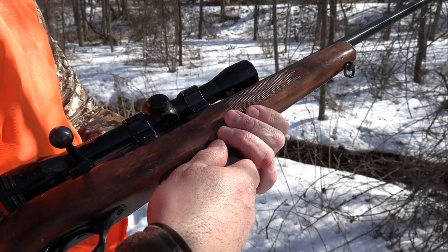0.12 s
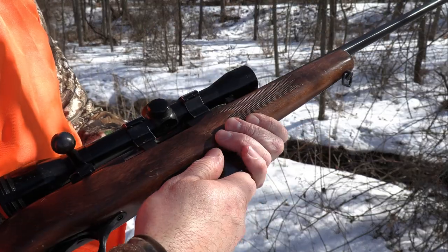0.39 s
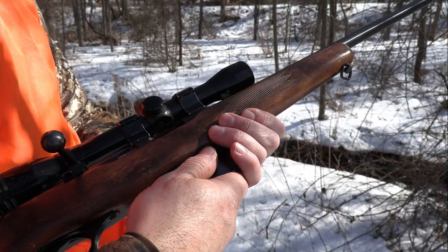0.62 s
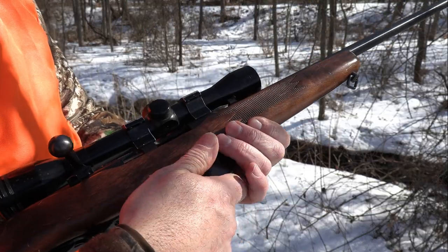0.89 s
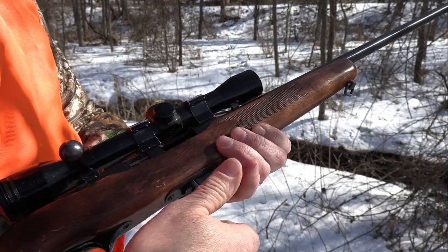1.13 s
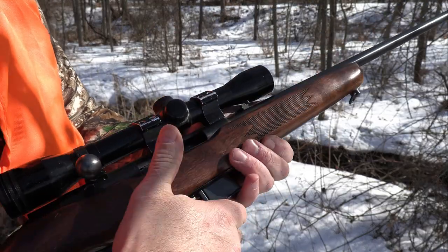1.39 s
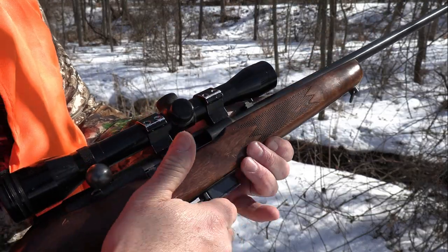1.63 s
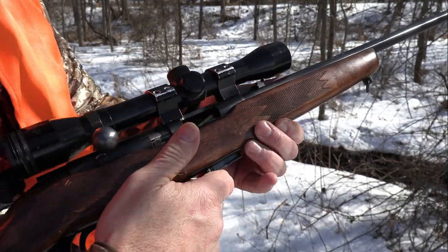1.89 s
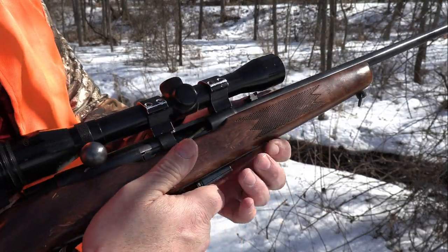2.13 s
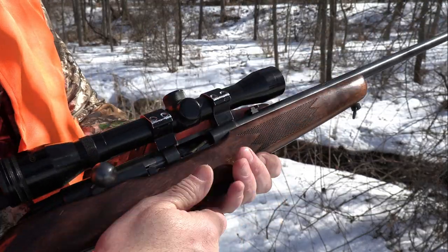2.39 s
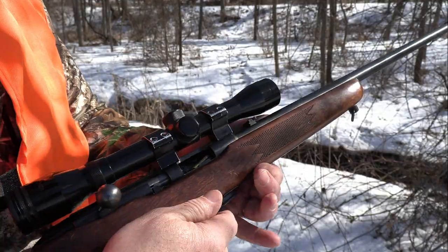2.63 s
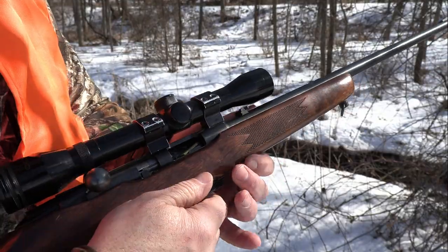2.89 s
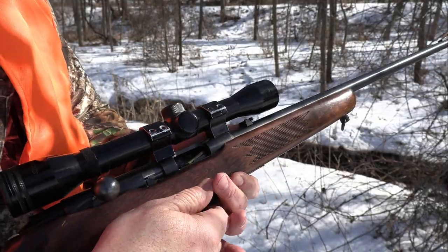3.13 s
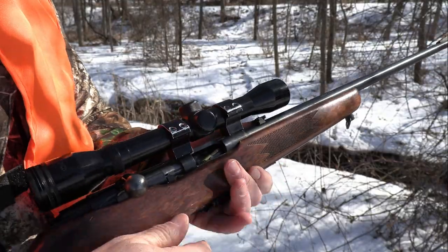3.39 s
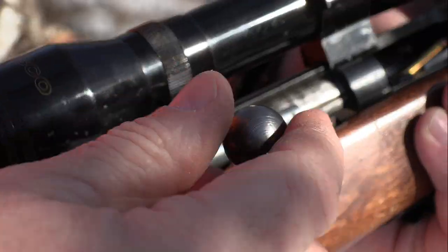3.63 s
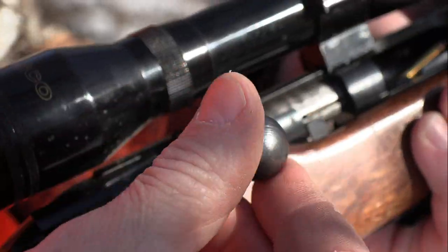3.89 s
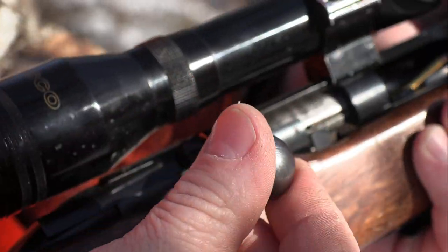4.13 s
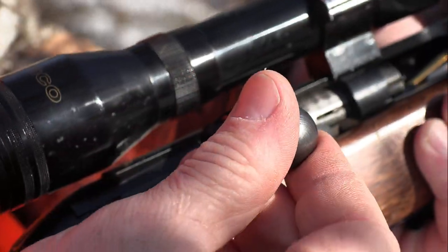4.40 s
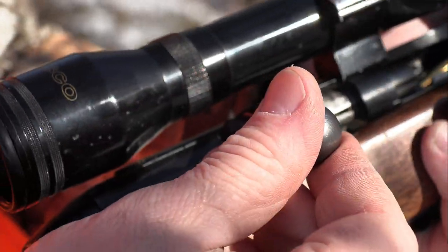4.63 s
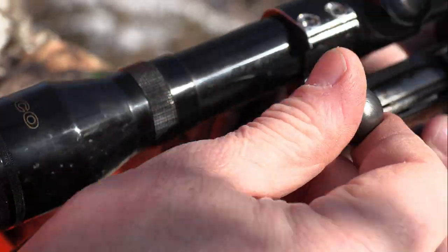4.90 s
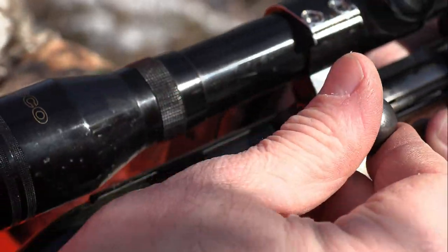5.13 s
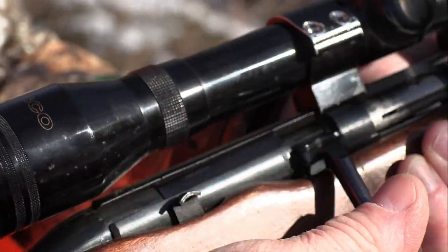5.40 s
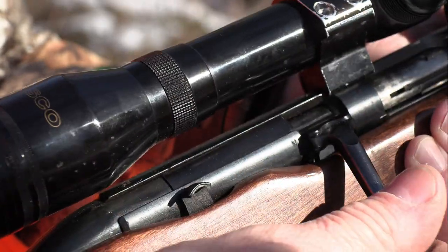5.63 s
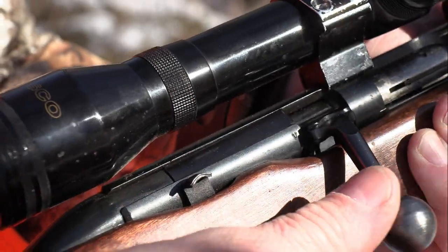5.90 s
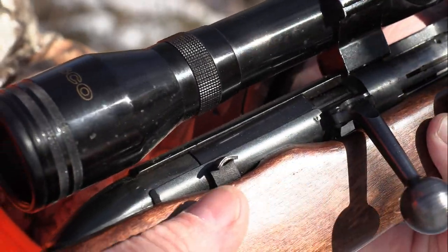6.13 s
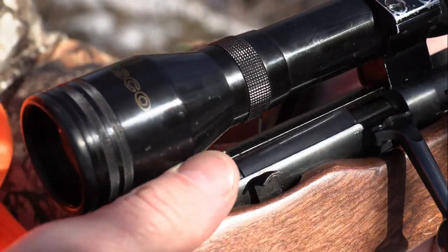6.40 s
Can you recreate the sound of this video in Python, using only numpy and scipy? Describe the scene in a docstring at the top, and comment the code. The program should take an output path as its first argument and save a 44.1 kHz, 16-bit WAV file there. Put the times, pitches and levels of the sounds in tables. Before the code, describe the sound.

Close, dry metallic clacks of a rifle magazine being fumbled and seated, a brief silent cut, then a bolt pushed home and locked outdoors.

```python
"""Snowy woods: a magazine is fumbled and seated in a bolt-action rifle, with some knocks leaving a ring.
About 3.4 s in, a cut leaves a brief gap of near silence before a closer view.
There small ticks of shifting hands are heard, then the bolt is pushed home and its handle locked.
Each knock is chattering steel that excites receiver and stock; filtered noise makes the slides and faint echoes.
Shaped noise throughout gives the woodland air and a jacket rustle that swells with the arms."""
import sys
import numpy as np
from scipy import signal
from scipy.fft import rfft, irfft
from scipy.io import wavfile
from scipy.ndimage import uniform_filter1d

SR = 44100
rng = np.random.default_rng(int(sys.argv[2]) if len(sys.argv) > 2 else 0)


def nominal_scale(level):
    """Amplitude ratio for a level in decibels (scalar or array-like)."""
    x = np.asarray(level, float) / 20
    return 10 ** x


def log_audio(samples):
    """Write samples as a 16-bit WAV file to the path given in sys.argv[1]."""
    # one column per channel
    frames = np.atleast_2d(samples).T
    # limit to full scale, then quantise
    limited = np.clip(frames, -1, 1)
    pcm = np.round(limited * 32767).astype(np.int16)
    wavfile.write(sys.argv[1], SR, pcm)


N = 287091  # length [samples]

# Knocks of magazine, cartridge, bolt and handle, before the bass cut: (time [s], steel peak [dB],
# crack centre [Hz], crack t60 [s], stock thump peak [dB], treble slope above 4 kHz [dB per octave])
KNOCKS = [(0.0236, -16.5, 3250, 0.014, -30, -1), (0.0434, -17.5, 2030, 0.013, -35, 4),
          (0.1266, -12, 3760, 0.009, -26.5, 2), (0.2406, -28.5, 1950, 0.019, -34.5, -7),
          (0.294, -35.5, 4700, 0.0071, -41.5, 0), (0.391, -21, 2140, 0.022, -48, 1),
          (0.611, -25, 1990, 0.047, -34, -20), (0.6122, -1, 3520, 0.007, -11, 8),
          (0.617, -17, 1530, 0.015, -22, 1), (0.728, -31, 1280, 0.03, -37, -1),
          (0.733, -32, 4850, 0.0084, -40, -3), (0.868, -38.5, 3140, 0.042, -46.5, -5),
          (1.0137, -29.5, 1420, 0.032, -35, 13.5), (1.0150, -16, 1360, 0.016, -22, -1),
          (1.3679, -33, 1260, 0.037, -37.5, -3), (1.4175, -25, 2300, 0.0069, -41, -18),
          (1.678, -34, 1080, 0.12, -39.5, 3), (1.7093, -5, 4770, 0.014, -25.5, -1.5),
          (1.7155, -4.5, 4900, 0.012, -27, 4.5), (1.7163, -3, 2920, 0.015, -21, -20),
          (1.7208, -22, 2640, 0.067, -40, 1), (1.731, -31, 4700, 0.029, -33, -2),
          (1.822, -37, 880, 0.011, -32.5, -8), (1.889, -40.5, 1500, 0.076, -42.5, -9),
          (1.945, -41, 2580, 0.011, -62, -12), (2.179, -38.5, 850, 0.016, -48, 7),
          (2.381, -37, 1610, 0.014, -57, 7), (2.424, -36.5, 3750, 0.0096, -59, -1),
          (3.767, -36, 2430, 0.007, -63, -26), (3.917, -42, 3040, 0.0081, -58, -6),
          (4.067, -41, 2880, 0.011, -48, 5), (4.254, -43, 1530, 0.015, -41, -5),
          (4.2900, -18, 5000, 0.0065, -45, 24), (4.2909, -10.5, 4720, 0.016, -29.5, 1),
          (4.292, -14.5, 3140, 0.0075, -36, -14), (4.303, -27.5, 3830, 0.017, -38, -4),
          (4.3157, -10.5, 5550, 0.0062, -49, 7), (4.3192, -30, 1210, 0.027, -24, -4),
          (4.409, -43, 1870, 0.0067, -44, -17), (4.49, -39.5, 2490, 0.0073, -60, -8),
          (4.524, -38, 2180, 0.01, -52, -3), (4.551, -36, 2930, 0.019, -33, -5),
          (4.555, -33.5, 1290, 0.044, -41.5, -5), (4.5800, -15.5, 2340, 0.0075, -35, -2.5),
          (4.589, -28.5, 1690, 0.013, -32.5, 1), (4.766, -35.5, 2090, 0.011, -64, -12),
          (4.865, -32, 950, 0.0082, -38, 7), (4.8840, -5, 2400, 0.016, -40, 6.5),
          (4.8879, -1.5, 4000, 0.0063, -14, 5.5), (4.888, -5, 1340, 0.02, -27, 3),
          (4.894, -16, 1480, 0.024, -16, 2), (4.9, -24, 3000, 0.017, -40, -16),
          (4.9067, -11.5, 1210, 0.014, -18.5, -1), (4.9309, -12, 1250, 0.011, -28, 7),
          (4.941, -22, 2000, 0.018, -32, -3), (4.953, -10.5, 980, 0.013, -19, 7),
          (5.034, -40, 1540, 0.033, -45, -18), (5.099, -38, 2030, 0.0054, -45.5, -22),
          (5.188, -43.5, 3450, 0.0086, -65, -4), (5.311, -41, 1630, 0.0085, -64, -6),
          (5.356, -29, 750, 0.0061, -45, -8), (5.377, -35, 796, 0.011, -63, -6),
          (5.397, -36, 795, 0.015, -69, -1), (5.4232, -12.5, 1024, 0.011, -19, -3),
          (5.4346, -19.5, 8000, 0.0092, -49, 8), (5.438, -21, 1500, 0.008, -59, 14),
          (5.4472, -2.5, 2850, 0.0074, -17.5, 2), (5.4531, -17, 3870, 0.015, -23, 2),
          (5.461, -25, 4030, 0.035, -55, 0), (5.47, -29.5, 3870, 0.034, -57, 1),
          (5.503, -36, 3500, 0.01, -60, -9), (6.012, -36.5, 800, 0.019, -60, -10)]
# Spectrum common to cracks and slides: (frequency [Hz], level [dB])
CRACK_SPECTRUM = [(200, -14.5), (350, -38), (600, 2), (1250, 2.5), (2350, -1), (3300, 1), (6000, -3),
                  (9000, -9.5), (13000, -30), (15500, -45.5), (17000, -90.5)]
# Modes of the steel receiver: (frequency [Hz], level [dB], t60 [s])
RECEIVER_MODES = [(1387, -3.5, 0.042), (2007, 10.5, 0.018), (2788, -4, 0.035), (3420, 3.5, 0.03),
                  (4580, 0.5, 0.013), (5090, 14.5, 0.012), (6210, 13, 0.01), (7840, 2, 0.017)]
# Modes of the gripped wooden stock: (frequency [Hz], level before a rising tilt [dB], t60 before grip damping [s])
STOCK_MODES = [(361, -9, 0.027), (440, -9.5, 0.041), (485, 0.5, 0.038), (548, 3, 0.052), (582, 6, 0.021),
               (673, -2, 0.032), (827, -1.5, 0.025)]
# Rings under a loose grip: (time [s], magazine spring peak [dB], fore-end peak before grip waver [dB],
# whole stock peak before grip waver [dB], build-up [s], share of the full t60 [ratio])
RINGS = [(0.044, -29, -46, -82, 0.15, 0.86), (0.393, -36.5, -60, -85, 0.0095, 0.59),
         (0.614, -46, -41, -49, 0.0022, 1), (0.734, -60, -41.5, -45, 0.0017, 0.64),
         (1.013, -34, -29, -38.5, 0.00088, 1), (1.717, -22, -25.5, -47, 0.0083, 0.79),
         (5.454, -58, -37.5, -39.5, 0.0069, 0.39)]
# Loosely held spring, fore-end and whole stock, a list each: (frequency [Hz], level [dB], full t60 [s])
LOOSE_MODES = [
    [(1252, -1.5, 0.15), (2573, 5.5, 0.03)],
    [(451, 2.5, 0.21), (375, -6, 0.12), (578, -5, 0.22)],
    [(196.5, 1, 0.33), (238, -11.5, 0.16)],
]
# Steel and fingers sliding: (start [s], peak time [s], end [s], rms level at the peak [dB], centre [Hz])
SLIDES = [(0.74, 0.795, 0.88, -53, 5000), (0.835, 0.865, 0.97, -52, 5500), (1.684, 1.696, 1.706, -42, 5200),
          (1.649, 1.72, 1.8, -42, 3500), (1.71, 1.815, 1.92, -49, 3800), (4.25, 4.285, 4.3, -42, 1500),
          (5.051, 5.108, 5.14, -49.5, 1800), (5.276, 5.345, 5.5, -54.5, 1500),
          (5.405, 5.455, 5.51, -43, 1800)]
# Short wooden rings near 560 Hz, with creaks and squeaks of grip and bolt:
# (time [s], frequency [Hz], level before the uneven loudness [dB], length [s])
SHORT_TONES = [(.117, 566, -40, 0.051), (0.239, 566, -45, 0.049), (1.871, 552, -47, 0.046),
               (1.937, 1173, -46, 0.026), (4.846, 2590, -47.5, 0.015), (5.172, 555, -51.5, 0.044),
               (6.303, 1670, -50.5, 0.027)]
# Small ticks, rattle after the seating knock and fingers shifting on steel and wood:
# (start [s], end [s], tick rate [per s], typical steel peak [dB])
TICKS = [(1.725, 1.87, 250, -41), (3.45, 4.25, 15, -51), (4.34, 5.35, 60, -46)]
# Arm movement heard as cloth rustle: (time [s], rms level [dB])
ARM_MOVES = [(0, -57), (.125, -57), (.27, -59.5), (.5, -57), (.77, -56), (1.125, -55), (1.25, -57),
             (1.6, -58.5), (1.75, -48), (1.875, -52), (2, -61.5), (2.17, -51.5), (2.3, -57), (2.75, -58.5),
             (2.88, -49), (3.125, -53.5), (3.3, -50.5), (3.45, -52.5), (3.627, -50.5), (3.875, -54),
             (4.125, -51), (4.375, -57.5), (4.75, -62), (4.9, -42), (5.25, -73), (5.5, -48.5),
             (5.75, -58.5), (6.0, -48.5), (6.16, -49.5), (6.27, -59.5), (6.51, -52)]
# Jacket colour: (frequency [Hz], relative level [dB per Hz])
JACKET_SPECTRUM = [(88, -61), (150, -24), (260, -3), (442, 4), (856, 2.5), (1130, 3), (1990, -1),
                   (4890, -11), (12000, -26), (15600, -43), (22000, -120)]
# Woodland and microphone hush: (frequency [Hz], relative level [dB per Hz])
AIR_SPECTRUM = [(15, -12.5), (25, -24), (60, -3), (128, -5), (252, -5), (410, -4), (568, -3), (1150, -11.5),
                (1390, -14), (1680, -13), (4480, -17), (13300, -28), (16500, -56.5)]
# Likeness of the two microphone ports in air and rustle: (frequency [Hz], left-right likeness [ratio])
PORT_LIKENESS = [(60, 1), (180, 0.94), (550, 0.87), (1650, 0.51), (4970, 0.33), (15000, 0.51)]
# Balance of the ports in air and rustle: (frequency [Hz], left minus right [dB])
PORT_BALANCE = [(60, -1.5), (180, 1), (550, -1), (1650, 2), (4970, 5), (15000, -0.5)]
# Gap at the cut: (fade-out start [s], fade-out end [s], fade-in start [s], fade-in end [s])
GAP = (3.349, 3.356, 3.4175, 3.419)

AIR_DB = -57  # rms
BRIGHTEN = 0.053  # dB per octave of extra brightness for each dB of rustle above -60 dB
WIDE_TILT_DB = 0.95  # per octave: the rustle is brighter before the gap
RISE_SHARE = 0.039  # a crack rises in this share of its t60, in 0.1 ms at least
SLIDE_DEPTH_DB = -26  # start and end of a stroke relative to its peak
CEILING = 0.93  # highest peak allowed in the mix [full scale]


def rifle():
    """All handling noise: knocks lean a little left before the gap (magazine), a little right after it (bolt)."""
    out = small_ticks()
    for s, *row in KNOCKS:
        # Both hands damp the stock before the gap; after it the bolt cracks more evenly.
        if s < GAP[0]:
            sound = knock(*row, left_db=1.2, hump_db=13, free=0.7)
        else:
            sound = knock(*row, left_db=-0.8, hump_db=9, free=0.99)
        add(out, s, sound)
    for s, *row in RINGS:
        add(out, s, loose_ring(*row))
    for s, *row in SHORT_TONES:
        add(out, s, short_tone(*row))
    for row in SLIDES:
        add(out, row[0], slide(*row))
    return out


def knock(db, centre_hz, t60, stock_db, treble_db, left_db, hump_db, free=0.81):
    """A chattering steel contact drives crack, receiver and stock; free scales the stock's ring time."""
    t = np.arange(4096) / SR
    hz = np.fft.rfftfreq(4096, 1 / SR)
    rise = (1 - np.exp(-t / max(RISE_SHARE * t60, 1e-4))) ** 2
    shape = rise * nominal_scale(-60 * t / max(t60, 0.004))  # no decay shorter than 4 ms
    common, own_left, own_right = np.tanh(3.0 * rng.standard_normal((3, 4096)))  # blows of even size
    own = signal.lfilter([1, 0.25], [1], [own_left, own_right])
    chatter = (common + 0.36 * own) * shape  # the microphone ports differ a little

    dull_db = 1.54 * np.log2(centre_hz / 3000) * np.log2(np.maximum(hz, 800) / 2000)  # low cracks are dull
    slope_db = treble_db * np.log2(np.maximum(hz, 4000) / 4000)
    centre_db = hump_db / (1 + (np.log2((hz + 1) / centre_hz) / 0.17) ** 2)
    # Dividing by the smoothed spectrum whitens the blows before they are coloured.
    uneven = np.sqrt(uniform_filter1d(abs(rfft(chatter.mean(0))) ** 2, size=60))
    gain = nominal_scale(read(CRACK_SPECTRUM, hz) + dull_db + slope_db + centre_db) / uneven
    crack = coloured(chatter, np.log(gain))

    receiver = ring(RECEIVER_MODES, detune=0.045)
    steel = signal.fftconvolve(crack, receiver[None], axes=1)[:, :4096]
    stock = ring(np.multiply(STOCK_MODES, [1, 1, free]), detune=0.0072, swell_s=0.002)
    push = shape * (0.5 + common)
    wood = np.diff(signal.fftconvolve(push, stock)[:4097])  # differencing tilts it upward
    metal = peaked(peaked(crack) + nominal_scale(-13.0) * peaked(steel))
    sound = nominal_scale(db) * metal + nominal_scale(stock_db) * peaked(wood)
    return sound * nominal_scale(np.array([[left_db], [-left_db]]) / 2)


def ring(modes, detune=0.0, swell_s=0.0):
    """Resonance as dying sines, randomly detuned by the grip; swell_s lets the ring build up."""
    t = np.arange(12000) / SR
    hz, db, t60 = np.transpose(modes)[:, :, None]
    hz = hz * (1 + detune * rng.standard_normal(hz.shape))
    tones = (nominal_scale(db - 60 * t / t60) * np.sin(2 * np.pi * hz * t)).sum(0)
    return tones * (1 - np.exp(-t / (swell_s + 1e-5)))


def loose_ring(spring_db, fore_end_db, stock_db, swell_s, share):
    """Magazine spring and wood resonate together; the hand damps the wood unevenly."""
    parts = []
    for db, modes in zip((spring_db, fore_end_db, stock_db), LOOSE_MODES):
        tone = ring(np.multiply(modes, [1, 1, share]), swell_s=swell_s)
        parts.append(nominal_scale(db) * peaked(tone))
    spring, fore_end, stock = parts
    grip_db = 2.5 * evened(uniform_filter1d(rng.standard_normal(12000), size=500))
    return np.tile(spring + nominal_scale(grip_db) * (fore_end + stock), (2, 1))


def slide(start, top, end, db, centre_hz):
    """Dense grit of uneven size under a stroke, coloured like the cracks with a broad hump."""
    hz = np.fft.rfftfreq(16384, 1 / SR)
    grain_db = 3.2 * np.minimum(rng.exponential(1, 16384), 4)
    grit = rng.standard_normal((3, 16384)) * nominal_scale(grain_db)
    hump_db = 12 / (1 + (np.log2((hz + 1) / centre_hz) / 0.8) ** 2)
    stereo_grit = grit[0] + 1.3 * grit[1:]  # one shared part, one for each side
    scrape = coloured(stereo_grit, np.log(nominal_scale(read(CRACK_SPECTRUM, hz) + hump_db)))
    t = start + np.arange(16384) / SR
    stroke_db = np.interp(t, [start, top, end], [SLIDE_DEPTH_DB, 0, SLIDE_DEPTH_DB])
    return evened(scrape) * nominal_scale(db + stroke_db) * (t < end)


def short_tone(hz, db, length_s):
    """A wooden ring, creak or squeak: a tone wavering in pitch and loudness that swells fast and fades."""
    t = np.arange(round(length_s * SR)) / SR
    wobble = 1 + 0.041 * evened(uniform_filter1d(rng.standard_normal(4096), size=200))[:len(t)]
    loudness = 1 + 0.6 * evened(uniform_filter1d(rng.standard_normal(4096), size=60))[:len(t)]
    tone = np.sin(2 * np.pi * np.cumsum(hz * wobble) / SR)
    swell = np.sin(np.pi * np.sqrt(t / length_s))
    return np.tile(nominal_scale(db) * loudness * tone * swell, (2, 1))


def small_ticks():
    """Rattle and shifting fingers: small knocks of twelve colours at random instants, a few of them stronger."""
    t = np.arange(N) / SR
    chance, size, kind = rng.random((N, 3)).T
    train = np.zeros(N)
    for start, end, per_s, db in TICKS:
        train += nominal_scale(db) * (t > start) * (t < end) * (chance < per_s / SR)
    train *= nominal_scale(-1.5 * np.log(size + 0.1))
    kind = (kind * 12).astype(int)
    out = np.zeros((2, N))
    for k, hz in enumerate(np.geomspace(900, 3600, 12)):
        # Here t60 sets only the rise: knock() holds the decay to 4 ms.
        tick = knock(0, hz, t60=0.0027, stock_db=-12.5, treble_db=-12.5, left_db=2.5, hump_db=5.5)
        out += signal.oaconvolve((train * (kind == k))[None], tick, axes=1)[:, :N]
    return out


def trunks(x):
    """Faint scattered echoes from snow and trunks: decaying, softened noise as an impulse response."""
    t = np.arange(SR // 3) / SR
    tail = rng.standard_normal((2, len(t))) * nominal_scale(-60 * t / 0.1) * (t > 0.004)  # t60 0.1 s, from 4 ms on
    tail = signal.lfilter([1], [1, -0.5], tail)
    return signal.fftconvolve(x.mean(0)[None], tail / np.linalg.norm(tail[0]), axes=1)[:, :N]


def jacket():
    """Cloth rubbing on cloth: a grainy rustle whose level follows the arms; harder rubbing is brighter."""
    s, db = np.transpose(ARM_MOVES)
    tilt_db = BRIGHTEN * (db + 60) + WIDE_TILT_DB * (s < GAP[0])

    def colour(hz, t):
        """Cloth spectrum tilted about 1500 Hz as the rubbing hardens."""
        octaves = np.log2(np.maximum(hz, 600) / 1500)
        return read(JACKET_SPECTRUM, hz) + np.interp(t, s, tilt_db) * octaves

    rustle = hiss(colour, patchy_db=1.7, flicker_db=1.1, size=512)
    fibres = rng.exponential(1, N // 16 + 1).repeat(16)[:N]
    rustle *= nominal_scale(1.2 * uniform_filter1d(fibres, size=16))  # crackly fibres
    # Evening the power over a third of a second keeps brightness out of the level.
    rustle /= np.sqrt(uniform_filter1d((rustle ** 2).mean(0), size=SR // 3))
    return rustle * nominal_scale(np.interp(np.arange(N) / SR, s, db))


def air():
    """The steady hush of the woods and the microphone, as coloured noise."""
    hush = hiss(lambda hz, t: read(AIR_SPECTRUM, hz) + 0 * t, patchy_db=0.0, flicker_db=1.0, size=2048)
    return nominal_scale(AIR_DB) * evened(hush)


def hiss(level_db, patchy_db, flicker_db, size):
    """Random short-time spectra, partly alike left and right; level_db(hz, t) gives the colour."""
    hop = size // 4
    frames = N // hop + 5
    hz = np.fft.rfftfreq(size, 1 / SR)[:, None]
    t = np.arange(frames) * hop / SR
    a, b, c, d, patches = rng.standard_normal((frames, size // 2 + 1, 5)).T
    patches = uniform_filter1d(patches, size=9, axis=0)
    patches = evened(uniform_filter1d(patches, size=12, axis=1))
    flicker = evened(uniform_filter1d(rng.standard_normal(frames), size=3))
    same = np.clip(read(PORT_LIKENESS, hz), -1, 1)
    shared, other = a + 1j * b, c + 1j * d
    early = np.exp(2j * np.pi * hz * 0.3 / SR)  # the left port hears it 0.3 sample sooner
    left = shared * early * nominal_scale(read(PORT_BALANCE, hz))
    right = same * shared + np.sqrt(1 - same ** 2) * other
    z = np.array([left, right])
    z *= nominal_scale(level_db(hz, t) + patchy_db * patches + flicker_db * flicker)
    return signal.istft(z, nperseg=size, noverlap=size - hop)[1][:, :N]


def coloured(x, log_gain):
    """Minimum-phase filter from a log gain over frequency, so that no sound precedes its blow."""
    phase = -signal.hilbert(np.r_[log_gain, log_gain[-2:0:-1]]).imag[:len(log_gain)]
    return irfft(rfft(x) * np.exp(log_gain + 1j * phase))


def evened(x):
    """Scales to rms 1."""
    return x / np.sqrt(np.mean(x ** 2) + 1e-20)


def peaked(x):
    """Scales to peak 1."""
    return x / (abs(x).max() + 1e-20)


def read(points, hz):
    """Reads a table on a log-frequency axis."""
    f, value = np.transpose(points)
    return np.interp(np.log(hz + 1), np.log(f + 1), value)


def add(mix, s, sound):
    """Mixes a sound in at time s."""
    part = mix[:, round(s * SR):][:, :sound.shape[1]]
    part += sound[:, :part.shape[1]]


def scene():
    """Rifle up close, thin in the bass as small things are, with its echoes over air and rustle."""
    bass_cut = signal.butter(4, 185, "high", fs=SR, output="sos")
    near = signal.sosfilt(bass_cut, rifle())
    return near + nominal_scale(-23.0) * trunks(near) + air() + jacket()


def band_limit(x):
    """A steep low-pass at the top of the band."""
    return signal.sosfilt(signal.butter(12, 16640, fs=SR, output="sos"), x)


def record(dry):
    """The cut dips the level by 60 dB for a moment, then peaks are held below a ceiling."""
    fade_db = np.interp(np.arange(N) / SR, GAP, [0, -60, -60, 0])
    mix = np.clip(dry * nominal_scale(fade_db), -CEILING, CEILING)
    return band_limit(mix)


dry = scene()
out = record(dry)
log_audio(out)
```